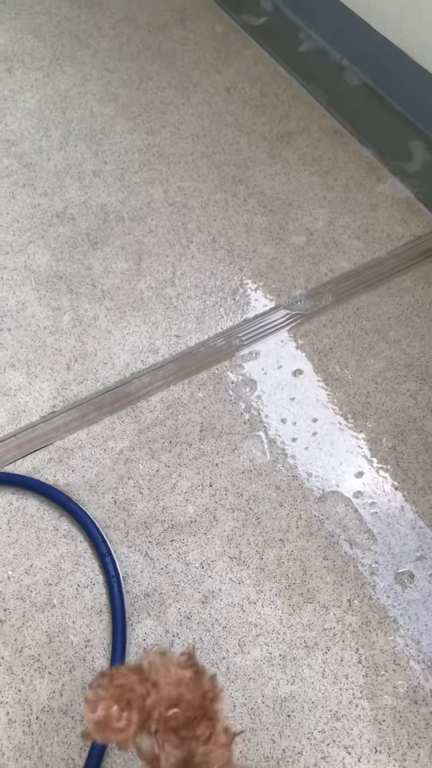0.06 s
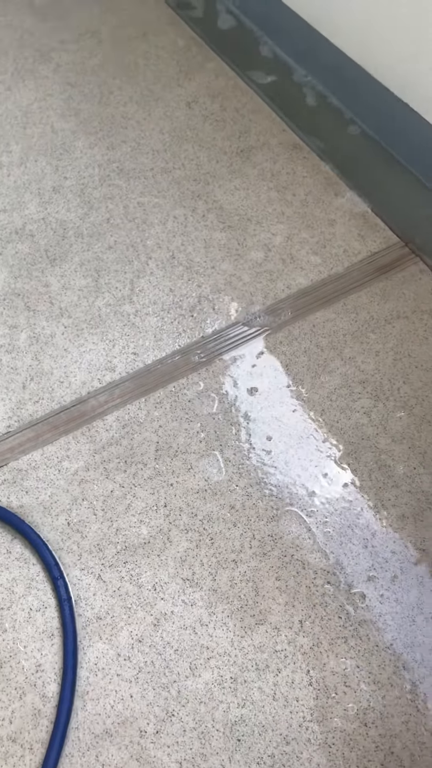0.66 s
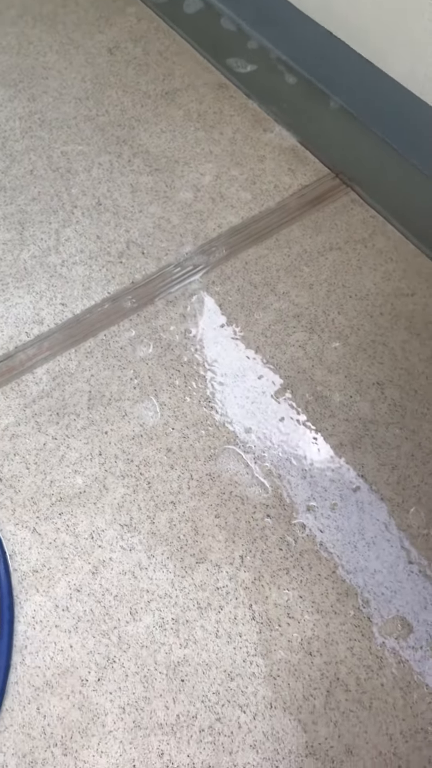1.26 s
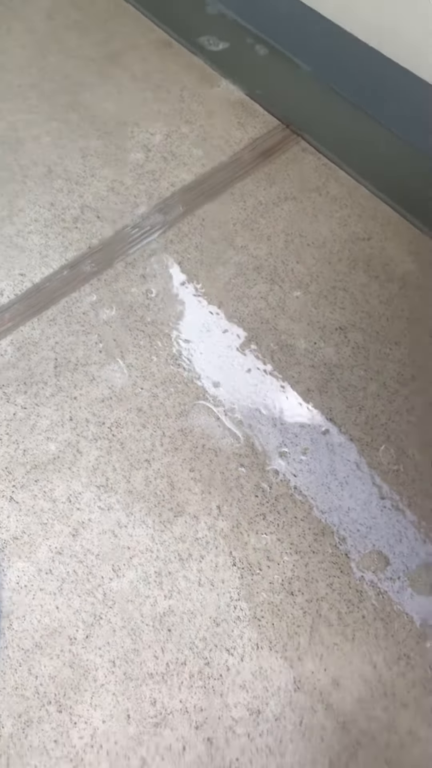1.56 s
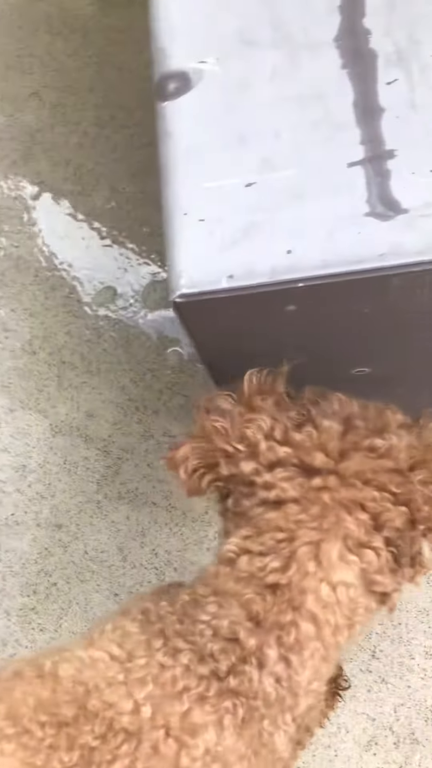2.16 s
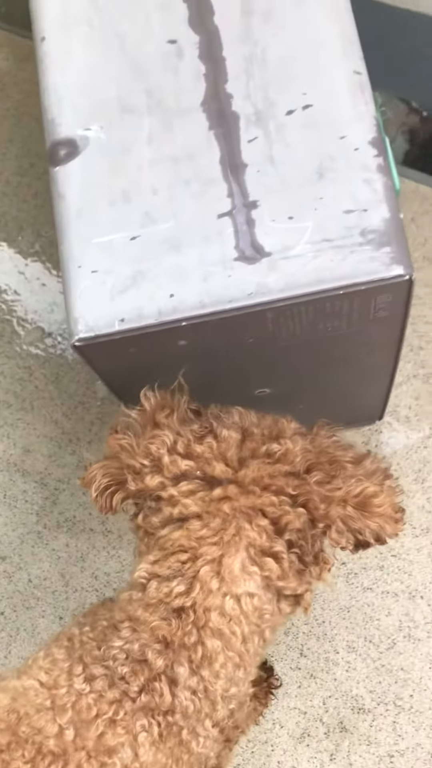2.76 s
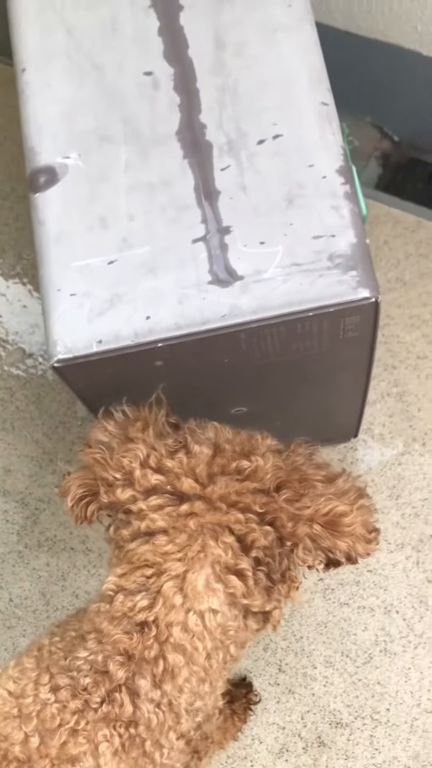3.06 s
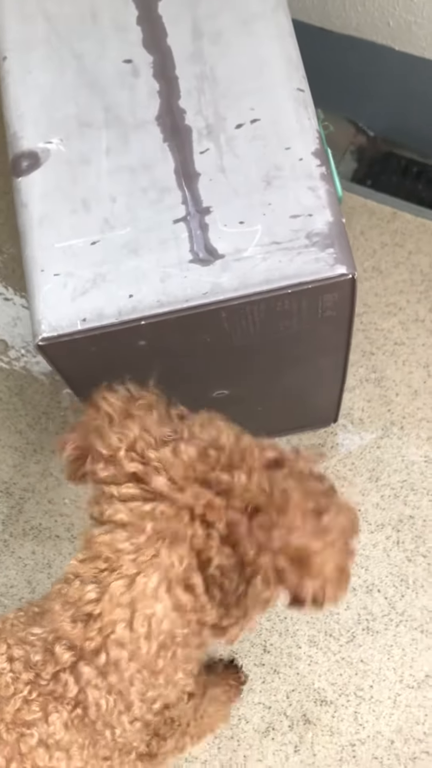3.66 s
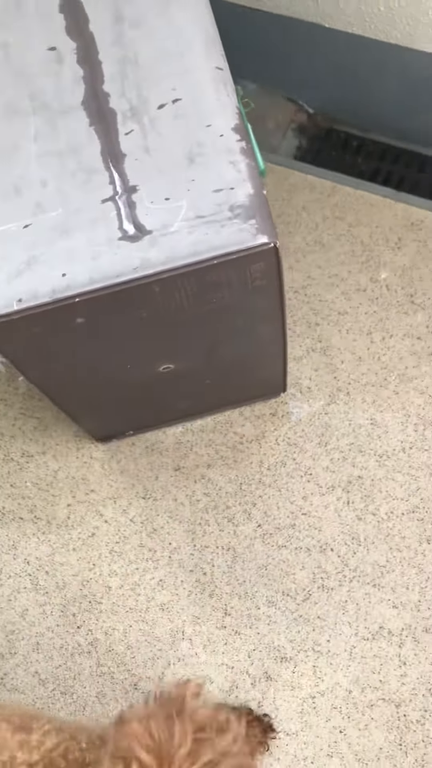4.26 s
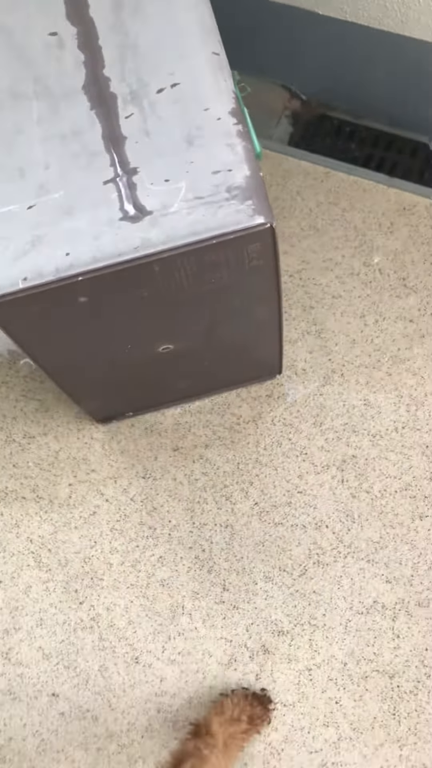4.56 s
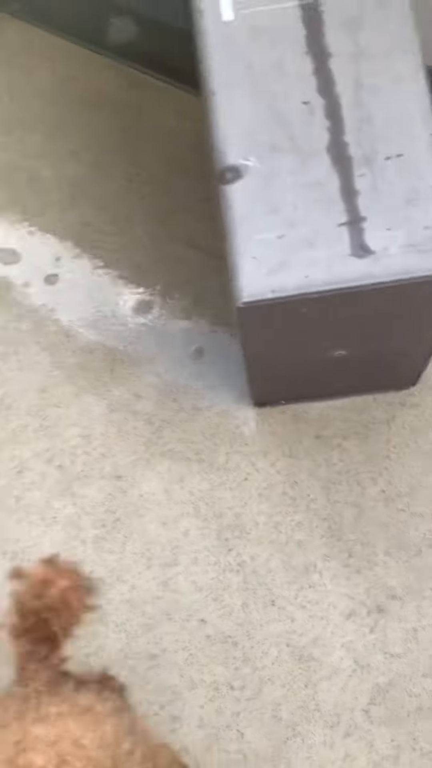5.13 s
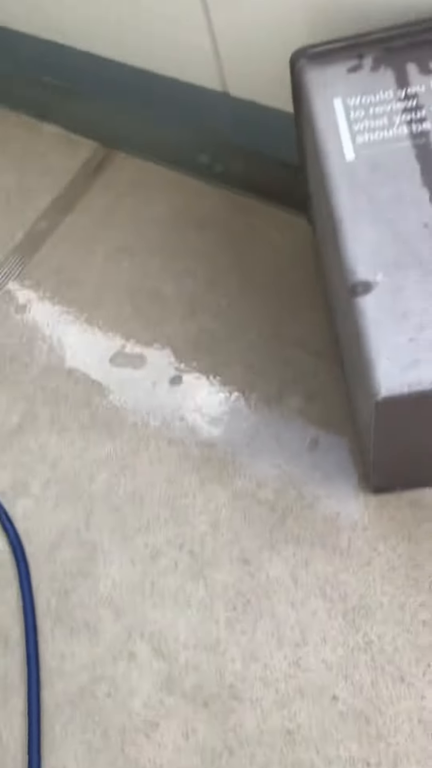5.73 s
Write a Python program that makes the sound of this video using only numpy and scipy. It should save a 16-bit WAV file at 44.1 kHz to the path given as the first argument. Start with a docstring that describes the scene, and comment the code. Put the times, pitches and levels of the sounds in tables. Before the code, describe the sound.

Water from a hose spatters on the wet concrete floor of a balcony. It starts a few steps away as a soft hiss, then comes close to the microphone and grows louder, with distinct slaps, bubbly plinks and ticking droplets. A soft thump and a small hard tick sound early on. Behind the water, a wavering low machine hum and the rumble of a town continue, and a distant vehicle swells faintly near the end.

```python
"""Water from a hose spatters on the wet concrete floor of a balcony, a few steps away and then closer.
Each drop's impact on the water film radiates a burst of noise, trapped air bubbles ring as resonators,
and low walls reflect both. A soft thump and a hard tick sound once each. Behind the water a wavering
machine note beats against a steady motor hum, over the rumble of the town and an approaching vehicle."""
import sys
import numpy as np
from scipy import signal
from scipy.fft import rfft, irfft
from scipy.io import wavfile
from scipy.ndimage import uniform_filter1d

SR = 44100
rng = np.random.default_rng(int(sys.argv[2]) if len(sys.argv) > 2 else 0)


def generate_wav(signal):
    """Clip the signal to [-1, 1] and save it as 16-bit WAV at the path in sys.argv[1]."""
    frames = np.transpose(np.atleast_2d(signal))
    scaled = np.clip(frames, -1, 1) * 32767
    pcm = np.round(scaled).astype(np.int16)
    wavfile.write(sys.argv[1], SR, pcm)


N = 259749


def from_db(db):
    """Amplitude ratio of a level in decibels."""
    return 10 ** (np.asarray(db) / 20)

def unit_rms(x):
    """Normalisation to a mean power of 1."""
    return x / np.sqrt(np.mean(x ** 2) + 1e-20)

def in_time(rows):
    """Linear interpolation of each column of a time curve at every sample."""
    times, *columns = np.transpose(rows)
    return [np.interp(np.arange(N) / SR, times, column) for column in columns]

def gain_at(spectrum, hz):
    """Spectral gain, interpolated in decibels over log frequency."""
    knots_hz, db = np.transpose(spectrum)
    return from_db(np.interp(np.log(hz), np.log(knots_hz), db))

def band(x, low_hz, high_hz, order=2):
    """Causal Butterworth band-pass."""
    return signal.sosfilt(signal.butter(order, [low_hz, high_hz], "band", fs=SR, output="sos"), x + 1e-18)

def coloured_noise(spectrum):
    """Spectral shaping of white noise; rms 1."""
    hz = np.maximum(np.arange(N // 2 + 1) * SR / N, 1)
    inside = (hz > spectrum[0][0] / 2) & (hz < spectrum[-1][0] * 2)
    return unit_rms(irfft(rfft(rng.standard_normal(N)) * gain_at(spectrum, hz) * inside, N))

def drift(turns_per_s):
    """Slow random modulation; rms 1."""
    knots = rng.standard_normal(2000)
    return unit_rms(np.interp(np.arange(N) / SR * turns_per_s, np.arange(len(knots)), knots))

def swell(middle_s, half_s, height):
    """Gaussian rise and fall around a moment."""
    return height * np.exp(-((np.arange(N) / SR - middle_s) / half_s) ** 2)

def phase_of(hz):
    """Phase is the running integral of frequency."""
    return 2 * np.pi * np.cumsum(hz) / SR

def impulses(times, sizes):
    """Impulse train: one sample for each event."""
    return np.bincount((np.asarray(times) * SR).astype(int), sizes, N)[:N]

def arrivals(per_s, spread_db):
    """Independent random arrivals: times and log-normal sizes, the largest capped."""
    chance = rng.random((int(per_s * N / SR), 13))
    deviation = chance[:, 1:].sum(1) - 6   # nearly Gaussian
    return chance[:, 0] * N / SR, from_db(spread_db * np.minimum(deviation, 1.6))

def ring(kicks, hz, t60):
    """Damped resonator: a unit impulse starts a decaying sine of height 1."""
    radius, angle = from_db(-60 / (t60 * SR)), 2 * np.pi * hz / SR
    return signal.lfilter([0, np.sin(angle)], [1, -2 * radius * np.cos(angle), radius ** 2], kicks + 1e-18)

def decay(kicks, t60):
    """Exponential decay: each impulse falls 60 dB in t60 seconds."""
    return signal.lfilter([1], [1, -np.exp(-np.log(1000) / (t60 * SR))], kicks + 1e-18)

def balcony(x, echo_db, t60=0.33):
    """Reverberation: reflections from floor, parapet and wall merge into a short diffuse tail."""
    t = np.arange(SR // 2) / SR
    tail = rng.standard_normal(len(t)) * np.exp(-np.log(1000) * t / t60) * (t > .004)
    return x + from_db(echo_db) * signal.fftconvolve(x, tail / np.linalg.norm(tail))[:N]


# Loudness of the town: (time [s], rumble level [dB], roar level [dB])
TOWN_LEVELS = [(0, -43, -42.5), (1.5, -38.5, -42.5), (2.75, -36.5, -38), (3.4, -37.5, -40),
               (4.8, -41, -39.5), (5.89, -44, -38)]
# Spectra of rumble and roar: (frequency [Hz], relative density [dB])
RUMBLE_SPECTRUM = [(22, -42), (27, -18), (32, -11.5), (45, -6), (62, -6.5), (90, -6), (110, 0.5),
                   (150, -33)]
ROAR_SPECTRUM = [(100, -5), (140, 9), (165, 2), (205, -1), (245, -1), (290, -2), (350, -1), (400, -6.5),
                 (470, -13.5), (720, -15), (2000, -23.5)]

def town(gust_db=0.5):
    """Incoherent summation: far traffic and ventilation blend into an uneven rumble and a soft roar."""
    rumble_db, roar_db = in_time(TOWN_LEVELS)
    rumble = from_db(rumble_db + gust_db * drift(12)) * coloured_noise(RUMBLE_SPECTRUM)
    return rumble + from_db(roar_db) * coloured_noise(ROAR_SPECTRUM)

# Approach of a far vehicle: (time [s], level [dB])
VEHICLE_LEVEL = [(0, -63), (3.5, -54.5), (4.8, -44.5), (5.4, -43.5), (5.72, -38.5), (5.89, -44)]
# Its spectrum: (frequency [Hz], relative density [dB])
VEHICLE_SPECTRUM = [(130, -15), (170, -0.5), (215, 0), (260, -2.5), (330, -2.5), (400, -24)]

def vehicle():
    """Spreading loss: a vehicle's low noise grows as it draws nearer."""
    return from_db(in_time(VEHICLE_LEVEL)[0]) * coloured_noise(VEHICLE_SPECTRUM)

def hum(rms, hz):
    """A sinusoid peaks at root two times its rms amplitude."""
    return np.sqrt(2) * rms * np.sin(phase_of(np.broadcast_to(hz, N)))

# Faint fan tones: (frequency [Hz], mean level [dB])
FAN_TONES = [(264, -57.5), (334, -67), (488.5, -64), (980, -68.5)]

def fans(wander_hz=2.553):
    """Tonal noise of rotation: narrow spectral lines that swell with the town's roar."""
    _, roar_db = in_time(TOWN_LEVELS)
    swell_db = roar_db - roar_db.mean()
    return sum(hum(from_db(db + swell_db), hz + wander_hz * drift(12)) for hz, db in FAN_TONES)

# Motor hum: (time [s], level [dB])
MOTOR_LEVEL = [(0, -57), (1.6, -53), (3.35, -49), (5.89, -55)]

def motor(hz=109.6):
    """Beating: this steady pitch lies just below the machine note and interferes with it."""
    return hum(from_db(in_time(MOTOR_LEVEL)[0]), hz)

# The machine note and its octave: (time [s], relative level [dB])
MACHINE_LEVEL = [(0.0, -36), (0.08, -52), (0.1, -39), (0.49, -31.5), (0.59, -50), (0.71, -40), (0.75, -57),
                 (0.87, -37.5), (1.35, -35), (1.39, -45), (1.43, -35), (2.0, -25), (2.03, -42),
                 (2.07, -25.5), (2.29, -48), (2.34, -30.5), (2.53, -47), (2.62, -28.5), (2.67, -40),
                 (2.71, -27), (2.92, -27), (2.99, -38), (3.07, -30), (3.43, -39.5), (3.48, -28.5),
                 (3.89, -39.5), (4.5, -31.5), (4.58, -49), (4.81, -27.5), (4.91, -45), (4.94, -27.5),
                 (5.07, -37.5), (5.74, -38), (5.79, -53), (5.82, -32), (5.89, -38)]
OCTAVE_LEVEL = [(0, -51.5), (1, -52.5), (2, -65), (4.4, -53.5), (5.89, -43)]
# Pitch of the note: (time [s], frequency [Hz])
MACHINE_PITCH = [(0, 111.9), (.47, 114.8), (.92, 112), (1.4, 116.1), (1.97, 117.7), (2.52, 114.4),
                 (2.82, 118.7), (3.35, 109.8), (3.52, 114.5), (4.62, 114.2), (4.8, 116.4), (5.33, 114.5),
                 (5.89, 118.2)]

def machine(gain_db=-0.4, unrest=0.24, turns_per_s=17):
    """Amplitude and phase modulation make a low note waver; its octave and a brief deeper note join it."""
    (db,), (hz,) = in_time(MACHINE_LEVEL), in_time(MACHINE_PITCH)
    flutter = 1 + unrest * (drift(turns_per_s) + 1j * drift(turns_per_s))
    flutter /= np.sqrt(uniform_filter1d(np.abs(flutter) ** 2, size=9000))
    note = np.sqrt(2) * from_db(db + gain_db) * (flutter * np.exp(1j * phase_of(hz))).imag
    octave = hum(from_db(in_time(OCTAVE_LEVEL)[0] + 2.9 * drift(14)), 2 * hz + 5 * drift(16))
    undertone = hum(swell(middle_s=4.79, half_s=0.16, height=from_db(-37.5)), hz=89.5)
    return note + octave + undertone

# Modes of the floor: (frequency [Hz], relative level [dB], T60 [s])
FLOOR_MODES = [(68, 1, 0.075), (118, 1, 0.05), (259, -1, 0.051)]

def thump(time_s=0.7392, gain_db=-22, half_contact_s=0.0011):
    """Modal response: a soft push, perhaps a footfall, excites the floor's low modes."""
    push = swell(time_s, half_contact_s, 1)
    return sum(from_db(gain_db + db) * ring(push / push.sum(), hz, t60) for hz, db, t60 in FLOOR_MODES)

# A hard tap and its rebound: (time [s], relative level [dB])
TICK_STRIKES = [(1.3696, -22.5), (1.3757, -32)]
# Modes they excite: (frequency [Hz], relative level [dB], T60 [s])
TICK_RESONANCES = [(2040, 5.5, 0.0087), (5270, -3, 0.015), (5640, -4, .012), (6000, -4, 0.013),
                   (7300, -11, 0.013), (8900, -18, 0.015)]

def tick(crack_db=1):
    """Impulse excitation: something small and hard taps the floor with a crack and a thin ring."""
    times, levels_db = np.transpose(TICK_STRIKES)
    kicks = impulses(times, from_db(levels_db))
    crack = from_db(crack_db) * decay(kicks, t60=0.026) * band(rng.standard_normal(N), 4900, 7800)
    modes = sum((-1) ** k * from_db(db) * ring(kicks, hz, t60)
                for k, (hz, db, t60) in enumerate(TICK_RESONANCES))
    return balcony(crack + band(modes, 3600, 15000, order=1), echo_db=-5)

# Hollow churning: (middle time [s], half length [s], frequency [Hz], level [dB])
AIR_POCKETS = [(0.5, 1, 1088, -56.5), (4.42, 0.32, 1255, -52), (4.458, 0.25, 1370, -49),
               (4.55, .3, 1570, -59)]

def gurgles(per_s=130, spread_db=6, t60=0.091):
    """Cavity resonance: drops keep striking air pockets in the puddle, each ringing at its own pitch."""
    out = np.zeros(N)
    for middle_s, half_s, hz, db in AIR_POCKETS:
        strikes = impulses(*arrivals(per_s, spread_db))
        out += swell(middle_s, half_s, from_db(db)) * unit_rms(ring(strikes, hz, t60))
    return out

# Where the stream lands: (time [s], nearness [0 far, 1 near])
STREAM_PATH = [(0, 0), (.3, 0.15), (.6, 0.1), (1.28, 0.33), (1.6, .48), (2.0, 0.62), (2.25, 0.87),
               (3.8, 0.96), (4.6, 0.86), (5.2, 0.81), (5.89, 0.57)]

def stream_nearness():
    """Source proximity at every sample; it governs the water's level and detail."""
    return in_time(STREAM_PATH)[0]

# The loudest stray droplets: (time [s], relative level [dB])
LOUD_DROPLETS = [(0.9955, -34), (1.1702, -38), (2.2394, -32), (3.1183, -31), (3.3643, -30), (3.6052, -36),
                 (3.7229, -28), (4.4024, -27), (4.4594, -29), (4.5114, -27.5), (4.6249, -30),
                 (4.9575, -27.5)]

def stray_droplets(gain_db=-0.5, faint_db=-40.5):
    """Brief impacts radiate treble: droplets tick on concrete, the faint ones heard only from near."""
    times, db = np.transpose(LOUD_DROPLETS)
    loud = impulses(times, from_db(db + gain_db))
    faint = from_db(faint_db) * stream_nearness() * impulses(*arrivals(per_s=36, spread_db=5.5))
    ticks = decay(loud + faint, t60=0.012) * band(rng.standard_normal(N), 5000, 15000)
    return balcony(ticks, echo_db=-3.5)

# Spectrum of splashing water: (frequency [Hz], relative density [dB])
WATER_SPECTRUM = [(450, -13), (720, -8), (920, -1.5), (1180, -5), (1600, -0.5), (2180, -5.5), (2900, -1),
                  (3900, -3.5), (4900, -6.5), (5800, -5.5), (6900, -12), (8500, -9.5), (13000, -13),
                  (15800, -13)]
BURST_EDGES_HZ = np.linspace(np.sqrt(450), np.sqrt(16000), 27) ** 2

def bursts(times, sizes, low_hz, high_hz, colour_db, scatter_s, rise_s, t60):
    """Impact noise in one band: fragments land with random delay and strength, and their energies add."""
    lateness, chance = rng.random((len(times), 2)).T
    strength = sizes * from_db(colour_db * (2 * chance - 2.5))
    energy = decay(impulses(times + scatter_s * lateness, strength ** 2), t60 / 2)
    pole = np.exp(-1 / (rise_s * SR))
    energy = signal.lfilter([1 - pole], [1, -pole], energy)   # rounds each onset
    noise = band(np.sqrt(energy) * rng.standard_normal(N), low_hz, high_hz)
    return gain_at(WATER_SPECTRUM, np.sqrt(low_hz * high_hz)) * noise

# The biggest gulps of water, levels relative:
# (time [s], pitch [Hz], slap level [dB], bubble level [dB], crack level [dB])
WATER_GULPS = [(0.218, 1096, -36, -35, -52), (0.221, 5200, -39, -39, -54), (0.247, 4530, -35, -46, -45),
               (0.428, 2520, -33, -40, -57), (0.681, 1720, -34, -40, -49), (0.793, 1117, -45, -34.5, -60),
               (0.835, 6160, -48, -35, -60), (0.876, 6140, -52, -37, -60), (0.933, 3730, -32.5, -42, -50),
               (1.078, 1384, -30, -32.5, -41), (1.222, 1013, -45, -37, -60), (1.34, 5400, -44, -37, -40),
               (1.574, 5510, -38, -37, -55), (1.587, 2220, -31, -29.5, -48), (1.635, 1400, -30, -41, -43),
               (1.697, 3600, -41, -33, -40), (1.784, 1240, -32, -35, -42), (1.879, 12500, -37, -42, -42),
               (1.888, 14200, -34, -31, -46), (1.905, 5900, -43, -30, -50), (1.91, 1600, -43, -27.5, -55),
               (1.943, 1650, -29, -30, -44), (1.95, 6000, -32, -41, -40), (2.077, 4400, -28.5, -41, -48),
               (2.091, 2930, -32, -25.5, -48), (2.134, 2910, -29, -26, -37.5),
               (2.305, 1600, -35, -29.5, -42), (2.358, 5540, -43, -31.5, -50), (2.393, 3800, -39, -34, -50),
               (2.453, 2200, -33, -42, -44), (2.496, 6840, -33, -44, -34), (2.507, 3700, -30, -35, -48),
               (2.772, 8000, -34, -38, -40), (2.81, 5070, -28.5, -42, -44), (2.917, 1970, -25.5, -31, -42),
               (3.026, 5930, -34, -31, -48), (3.033, 3180, -33, -32, -50), (3.136, 9360, -32, -29, -40),
               (3.221, 2750, -27, -25, -46), (3.279, 1810, -29, -33, -48), (3.412, 3500, -28, -33, -38),
               (3.426, 3500, -28, -38, -36), (3.482, 5400, -29, -38, -37), (3.532, 6200, -38, -36, -39),
               (3.621, 1710, -37, -37, -35), (3.655, 3000, -30, -37, -36), (3.738, 2430, -34, -23, -33),
               (3.783, 3620, -25, -31, -34), (3.842, 8900, -28, -33, -39), (3.875, 6000, -29, -38, -38),
               (3.931, 3400, -28, -35, -34), (4.121, 6040, -31, -39, -33.5), (4.187, 1002, -26.5, -32, -47),
               (4.208, 893, -36, -36, -55), (4.205, 5500, -33, -42, -41), (4.247, 3680, -29, -34, -48),
               (4.257, 5550, -37, -35, -48), (4.284, 5620, -32, -43, -35), (4.302, 2400, -26, -36, -46),
               (4.358, 3760, -31.5, -33, -40), (4.444, 1454, -26, -31, -44), (4.534, 8900, -30, -38, -40),
               (4.591, 1357, -21, -26, -39), (4.608, 4020, -38, -29, -57), (4.638, 1250, -36, -42, -50),
               (4.763, 9900, -29, -32, -39), (4.782, 3840, -33, -29, -50), (4.833, 3510, -34, -30, -55),
               (4.898, 1050, -33, -40, -45), (4.973, 1400, -22.5, -32, -48), (5.013, 11900, -29, -33, -46),
               (5.026, 1810, -34, -33, -50), (5.114, 2150, -23, -29, -36), (5.128, 3200, -33, -38, -46),
               (5.172, 1526, -35, -32, -55), (5.222, 1000, -30, -41, -50), (5.253, 11100, -37, -40, -37),
               (5.285, 6150, -36, -31, -33), (5.372, 5950, -38, -31, -52), (5.608, 6300, -29, -34, -42),
               (5.671, 1230, -25.5, -39, -38), (5.673, 3200, -33, -42, -50)]

def slaps(gain_db=-1.1, skirt_db_per_octave=9.5, crack_gain_db=4.0):
    """Liquid impact: a gulp meets the film with a crack and a noise burst strongest around its pitch."""
    times, pitch_hz, slap_db, _, crack_db = np.transpose(WATER_GULPS)
    edges = BURST_EDGES_HZ[::2]
    centres = np.sqrt(edges[:-1] * edges[1:])
    shape = from_db(-skirt_db_per_octave * np.abs(np.log2(centres[:, None] / pitch_hz)))
    power = (gain_at(WATER_SPECTRUM, centres) ** 2 * 2 * np.diff(edges) / SR) @ shape ** 2
    sizes = from_db(slap_db + gain_db) * shape / np.sqrt(power)
    body = sum(bursts(times, size, low, high, colour_db=3.0, scatter_s=0.0012, rise_s=0.00087, t60=0.038)
               for size, low, high in zip(sizes, edges, edges[1:]))
    crack_envelope = decay(impulses(times, from_db(crack_db + crack_gain_db)), t60=0.03)
    crack = crack_envelope * band(rng.standard_normal(N), 4000, 14000)
    return balcony(body + crack, echo_db=-5.5)

def plinks(gain_db=-1.7, t60_at_3khz=0.04, rise_s=0.00053, glide=0.084,
           brood_db=-8.0, brood_spread=0.216, brood_s=0.0032):
    """Bubble resonance: each gulp's bubble rises in pitch as it nears the surface; three more follow."""
    out, t = np.zeros(N + SR), np.arange(SR // 12) / SR
    for time_s, main_hz, _, db, _ in WATER_GULPS:
        brood = [(time_s + brood_s * late, main_hz * np.exp(brood_spread * (2 * size - 1)), db + brood_db)
                 for late, size in rng.random((3, 2))]
        for start_s, hz, bubble_db in [(time_s, main_hz, db)] + brood:
            age = t / (t60_at_3khz * np.sqrt(3000 / hz))   # small bubbles die sooner
            phase = phase_of(hz * (1 + glide * np.minimum(age, 1)))
            envelope = (1 - np.exp(-t / rise_s)) * np.exp(-np.log(1000) * age)
            at = int(start_s * SR)
            out[at:at + len(t)] += from_db(bubble_db + gain_db) * envelope * np.sin(phase)
    return balcony(out[:N], echo_db=-5.5)

def small_bubbles(per_s=560, spread_db=5.5, cycles=76, longest_s=0.032, chirp=0.042, db_per_octave=-1.2):
    """Damped oscillation: the thin film traps small bubbles, each ringing briefly at a rising pitch."""
    times, sizes = arrivals(per_s, spread_db)
    hz = rng.uniform(np.sqrt(1250), np.sqrt(14000), len(times)) ** 2
    t60 = np.minimum(cycles / hz, longest_s)
    sizes *= gain_at(WATER_SPECTRUM, hz) * from_db(db_per_octave * np.log2(hz))
    sizes *= np.sqrt(np.sqrt(hz) / t60)   # offsets the sparser, shorter rings of the treble
    t = np.arange(SR // 35) / SR
    age = np.minimum(t / t60[:, None], 1)
    envelopes = sizes[:, None] * np.exp(-np.log(1000) * age) * (age < 1)
    pings = envelopes * np.sin(2 * np.pi * hz[:, None] * t * (1 + chirp * age))
    at = (times * SR).astype(int)[:, None] + np.arange(len(t))
    return unit_rms(np.bincount(at.ravel(), pings.ravel(), N)[:N])

def drops(per_s=235, spread_db=4.5, clump_db=2.0, low_t60=0.069, high_t60=0.021):
    """Shot noise: drops land in clumps, each bursting with its own colour, the treble dying first."""
    times, sizes = arrivals(per_s, spread_db)
    sizes *= from_db(clump_db * np.tanh(drift(26)))[(times * SR).astype(int)]
    t60s = np.geomspace(low_t60, high_t60, len(BURST_EDGES_HZ))
    out = np.zeros(N)
    for low, high, t60 in zip(BURST_EDGES_HZ, BURST_EDGES_HZ[1:], t60s):
        noise = bursts(times, sizes, low, high, colour_db=15, scatter_s=0.0023, rise_s=0.0013, t60=t60)
        out += noise / np.sqrt(t60)
    return unit_rms(out)

def even_flow(x):
    """Constant flow gives constant power, however the water splits into drops; running rms 1."""
    return x / np.sqrt(uniform_filter1d(x ** 2, size=5600) + 1e-12)

# The water heard from afar: (frequency [Hz], relative density [dB])
WASH_SPECTRUM = [(450, -7), (560, 2.5), (780, -2.5), (1020, 4.5), (1350, -1.5), (1700, -6.5), (2450, 5),
                 (2950, -12), (3900, -0.5), (4900, -4), (6000, -9.5), (7000, -11.5), (9000, -12),
                 (10500, -15), (15800, -18)]
# Splash, patter and spray bands: (lower edge [Hz], upper edge [Hz])
STREAM_BANDS = [(450, 2200), (2200, 7000), (7000, 15800)]
# The same three bands: (level when far [dB], level when near [dB])
STREAM_LEVELS = [(-47, -44), (-51.5, -43.5), (-59, -49)]

def stream(bubble_db=-1.8, wash_db=-1.3, far_grain_share=0.4, spurt_db=1.2):
    """Distance cues: afar a soft wash; closer, louder, with distinct drops, bubbles and spurts of spray."""
    nearness = stream_nearness()
    grains = unit_rms(balcony(drops() + from_db(bubble_db) * small_bubbles(), echo_db=-3.5))
    wash = from_db(wash_db) * coloured_noise(WASH_SPECTRUM)
    grain_share = far_grain_share + (1 - far_grain_share) * nearness
    water = np.sqrt(grain_share) * grains + np.sqrt(1 - grain_share) * wash
    splash_db, patter_db, spray_db = [far + (near - far) * nearness for far, near in STREAM_LEVELS]
    splash_db += swell(middle_s=4.13, half_s=0.44, height=1.0)   # briefly fuller
    spray_db += spurt_db * nearness * drift(30)
    return sum(from_db(db) * even_flow(band(water, *edges, order=4))
               for db, edges in zip((splash_db, patter_db, spray_db), STREAM_BANDS))

def scene():
    """Superposition in one channel: the water in front, the machines and the town behind."""
    foreground = stream() + slaps() + plinks() + stray_droplets() + tick() + gurgles()
    background = machine() + motor() + fans() + vehicle() + town()
    return (foreground + background + thump())[None]

# Peaks and dips of the microphone port: (frequency [Hz], bandwidth [Hz], gain [dB])
PORT_RESONANCES = [(922, 85, 3), (1640, 900, -0.5), (2270, 1090, -5), (4870, 440, -4.5), (5710, 860, 3),
                   (7800, 1440, -3), (8280, 730, 4), (10230, 300, -6.5)]
LOW_CUT_HZ, HIGH_CUT_HZ = 33, 15900

def record(dry):
    """Resonances of the microphone port colour the sound; the deepest bass and the top are cut."""
    for hz, width_hz, db in PORT_RESONANCES:
        resonance = signal.lfilter(*signal.iirpeak(hz, hz / width_hz, fs=SR), dry)
        dry = dry + (from_db(db) - 1) * resonance
    dry = signal.sosfilt(signal.butter(6, LOW_CUT_HZ, "high", fs=SR, output="sos"), dry)
    return signal.sosfilt(signal.ellip(12, .1, 90, HIGH_CUT_HZ, fs=SR, output="sos"), dry)


dry = scene()
out = record(dry)
generate_wav(out)
```